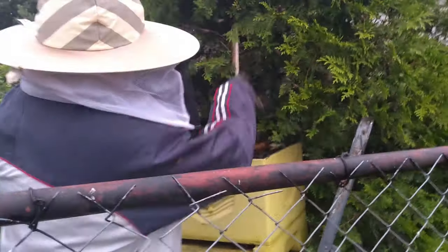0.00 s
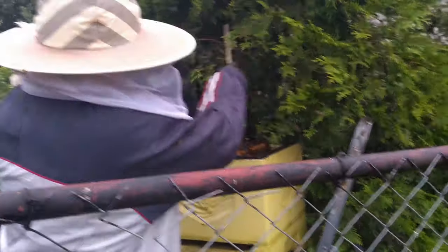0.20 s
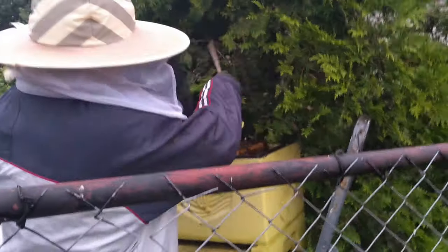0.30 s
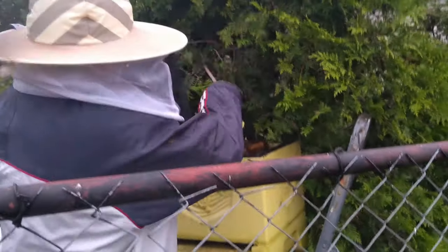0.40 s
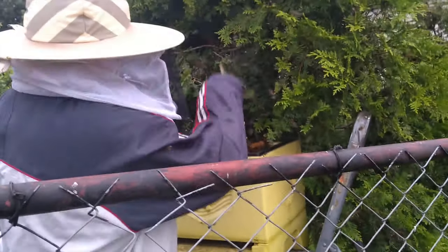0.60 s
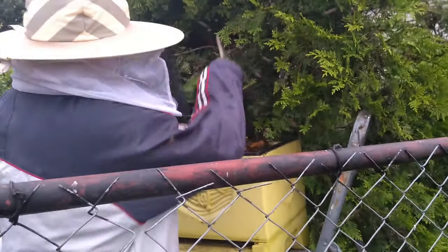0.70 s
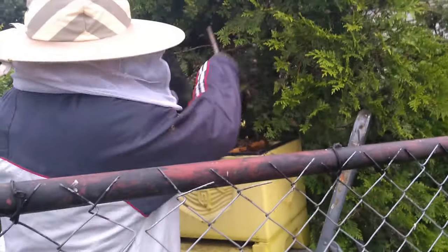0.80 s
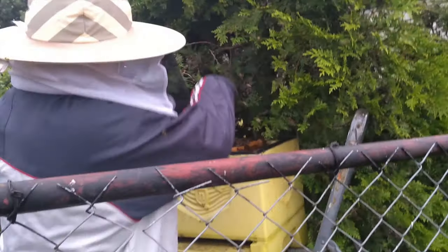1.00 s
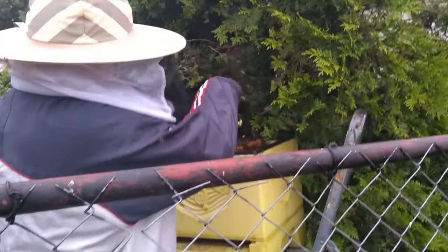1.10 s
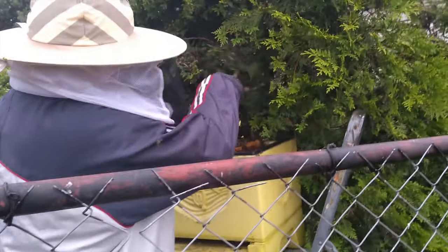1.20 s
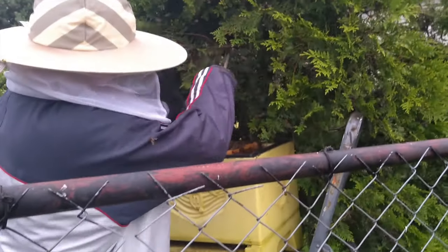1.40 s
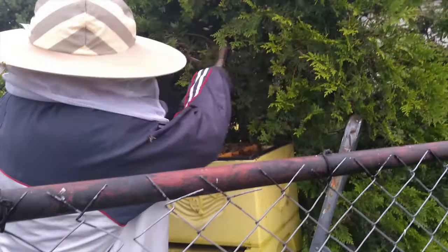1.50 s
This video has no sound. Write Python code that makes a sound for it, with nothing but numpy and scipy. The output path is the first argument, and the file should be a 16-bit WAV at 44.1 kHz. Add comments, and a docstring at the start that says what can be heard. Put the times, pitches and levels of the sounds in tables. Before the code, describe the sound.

A bee buzzes twice right past the microphone, softly bumping it, then flies off.

```python
"""A garden, beside an open beehive. One honeybee swerves twice right past the microphone, buzzing; its wing
strokes brush the case with soft thumps and a tick and buffet it with puffs of air, then it flies off.
Other bees hum faintly at the hive. Behind them a distant wash, a low rumble and wavering low tones
swell towards the end over a fine hiss, and something rustles briefly."""
import sys
import numpy as np
from scipy import signal
from scipy.fft import rfft, irfft
from scipy.io import wavfile

SR = 44100
rng = np.random.default_rng(int(sys.argv[2]) if len(sys.argv) > 2 else 0)


def put_to_file(sound):
    """Save the sound as 16-bit audio at rate SR, in the file named by the first command-line argument."""
    columns = np.atleast_2d(sound).T  # one column per channel
    safe = np.clip(columns, -1, 1)
    whole_steps = np.round(safe * 32767)
    wavfile.write(sys.argv[1], SR, whole_steps.astype(np.int16))


N = 70560
T = np.arange(N) / SR
BIN_HZ = np.arange(N // 2 + 1) * SR / N


def from_db(db):
    """Decibels to gain."""
    return 10 ** (np.asarray(db) / 20)


def unit_power(x):
    """Scale to an RMS of 1."""
    return x / np.sqrt(np.mean(x ** 2) + 1e-20)


def in_time(rows):
    """Glide between timed rows: one curve for each column after the time."""
    times, *columns = np.transpose(rows)
    return [np.interp(T, times, column) for column in columns]


def fader(levels):
    """Gain at every sample, from rows of seconds and dB."""
    return from_db(in_time(levels)[0])


def swell(centre_s, width_s):
    """A smooth bell of height 1; its width is one standard deviation."""
    return np.exp(-.5 * ((T - centre_s) / width_s) ** 2)


def db_at(colour, hz):
    """Read a spectrum on a log-frequency axis."""
    points_hz, db = np.transpose(colour)
    return np.interp(np.log(np.maximum(hz, 1)), np.log(points_hz), db)


def drift(rate_hz):
    """A smooth random wander with an RMS of 1."""
    pole = np.exp(-2 * np.pi * rate_hz / SR)
    wander = signal.lfilter([1], [1, -2 * pole, pole * pole], rng.standard_normal(2 * N))
    return unit_power(wander[N:])


def noise(colour):
    """Unit-power noise with a given spectrum."""
    white = rfft(rng.standard_normal(N))
    return unit_power(irfft(white * from_db(db_at(colour, BIN_HZ)), N))


def phase_of(hz):
    """Running phase of a moving pitch."""
    return 2 * np.pi * np.cumsum(hz) / SR


def partial(phase, ratio):
    """A unit-power sine at a multiple of the pitch, signed to stack into a saw-like wave."""
    return -np.sqrt(2) * np.sin(ratio * phase)


def ports(x, left_trim_db=0):
    """The microphone's two ports: the left hears later, inverted and at its own level."""
    lag_s, left_db = 0.0004835, -2
    late = irfft(rfft(x) * np.exp(-2j * np.pi * BIN_HZ * lag_s), N)
    return np.array([-from_db(left_db + left_trim_db) * late, x])


def diffuse(colour):
    """Wide noise, independent on each side."""
    return np.array([noise(colour), noise(colour)])


def lean_right(x, left_db=-18.5):
    """Place a sound well to the right."""
    return np.array([from_db(left_db) * x, x])


# The hiss sinks mid-scene and creeps back. Each row: time in seconds, level in dB.
HISS_LEVEL = [(0,-75.5),(0.35,-79.5),(0.5,-85),(0.85,-85),(1.0,-81.5),(1.6,-77)]
# Airy top, also used for the close bee's wisps. Each row: frequency in Hz, relative level in dB.
HISS_COLOUR = [(2000,-14.5),(5000,0.5),(8000,0),(14000,-0.5)]

def hiss():
    """A fine, bright hiss, leaning left."""
    bed = ports(noise(HISS_COLOUR), left_trim_db=6.5) + 0.18 * diffuse(HISS_COLOUR)
    return bed * fader(HISS_LEVEL)


# The wash dips, then builds to the end. Each row: time in seconds, level in dB.
WASH_LEVEL = [(0,-61),(0.17,-59.5),(0.43,-69.5),(0.7,-67.5),(1.0,-62),(1.25,-59.5),(1.42,-58),(1.502,-54.5),(1.6,-53.5)]
# Full mids, dull top. Each row: frequency in Hz, relative level in dB.
WASH_COLOUR = [(60,-1),(150,0),(350,-2.5),(520,1),(650,-6.5),(1050,-1),(1400,0.5),(1800,-2),(2400,-6.5),(3400,-15.5),(5000,-24.5),(7000,-35.5),(14000,-54)]

def distant_wash(split_hz=1330):
    """Far-off outdoor noise whose lows reach both ports in step."""
    wash = noise(WASH_COLOUR)
    lows = signal.sosfiltfilt(signal.butter(6, split_hz, fs=SR, output="sos"), wash)
    centred_lows = np.array([from_db(-0.5) * lows, lows])
    highs = ports(wash - lows, left_trim_db=1.0)
    return (centred_lows + highs + 0.45 * diffuse(WASH_COLOUR)) * fader(WASH_LEVEL)


# The rumble falls away and swells late. Each row: time in seconds, level in dB.
RUMBLE_LEVEL = [(0,-63.5),(0.15,-62),(0.45,-71.5),(0.7,-72),(1.05,-69.5),(1.151,-71),(1.422,-65),(1.49,-65),(1.6,-58)]
# Weight around 80 Hz. Each row: frequency in Hz, relative level in dB.
RUMBLE_COLOUR = [(25,-17),(50,-1),(80,6),(115,4.5),(150,-6.5),(220,-5),(400,-31.5)]

def rumble():
    """A bed of bass noise on the right."""
    return lean_right(noise(RUMBLE_COLOUR)) * fader(RUMBLE_LEVEL)


# Far-off tones, one curve each. Each row: time in seconds, pitch in Hz, level in dB.
HUM_CURVES = [
    [(0.45,140.7,-89),(0.65,139.4,-68),(0.95,137.9,-75),(1.15,146.6,-69),(1.33,140.7,-61.5),(1.42,171.2,-66),(1.6,184,-61.5)],
    [(1.0,108.4,-89),(1.17,107.5,-62.5),(1.4,109.5,-71),(1.49,115.6,-58.5),(1.6,113.5,-58)],
    [(1.3,188.8,-77.5),(1.4,224.3,-61),(1.5,276.7,-63.5),(1.6,276.3,-56)],
]

def low_hum(waver=0.03, flicker_db=3.3):
    """Low tones that waver and swell in the distance."""
    out = np.zeros(N)
    for curve in HUM_CURVES:
        hz, db = in_time(curve)
        gain = from_db(db + flicker_db * drift(19))
        phase = phase_of(hz * (1 + waver * drift(17)))
        out += gain * partial(phase, 1)
    return lean_right(out)


# Two light brushes, close together. Each row: centre in seconds, level in dB, width in seconds.
RUSTLES = [(0.967,-73.5,0.0066),(1.003,-70,0.026)]
# Only the very top. Each row: frequency in Hz, relative level in dB.
RUSTLE_COLOUR = [(7000,-19),(12000,0.5),(14000,-2)]

def rustle(grain_db=5):
    """A brief, bright, grainy brush, perhaps of a sleeve."""
    grains = unit_power(noise(RUSTLE_COLOUR) * from_db(grain_db * drift(300)))
    return grains * sum(from_db(db) * swell(centre, width) for centre, db, width in RUSTLES)


# The hive's hum recedes and returns. Each row: time in seconds, level in dB.
HIVE_LEVEL = [(0,-61.5),(0.14,-61.5),(0.45,-77),(1.3,-72.5),(1.5,-59.5)]
# A mellow buzz. Each row: frequency in Hz, relative harmonic level in dB.
HIVE_COLOUR = [(250,-2.5),(500,-2.5),(750,-4),(1000,-6),(1300,-13.5),(2000,-23),(3000,-22.5)]

def hive(bees=5, wingbeat_hz=250.4, pitch_spread=0.055, flicker_db=2.5):
    """The wingbeats of several distant bees, each wandering in pitch and level."""
    out = np.zeros(N)
    for _ in range(bees):
        phase = phase_of(wingbeat_hz * (1 + pitch_spread * drift(4)))
        buzz = np.zeros(N)
        for k in range(1, 12):
            gain = from_db(db_at(HIVE_COLOUR, k * wingbeat_hz))
            buzz += gain * np.sin(k * phase + rng.uniform(0, 2 * np.pi))
        out += buzz * from_db(flicker_db * drift(2.3))
    return unit_power(out) * fader(HIVE_LEVEL)


# Wing air hits the microphone. Each row: centre in seconds, level in dB, width in seconds, cutoff in Hz.
PUFFS = [(0.2262,-30.5,0.0028,1150),(0.228,-27,0.0073,153),(0.262,-40,0.02,164),(0.313,-29.5,0.0064,223),(0.342,-32.5,0.01,1040),(0.353,-34,0.007,84),(0.365,-28,0.005,178)]
# A puff's body before its low-pass. Each row: frequency in Hz, relative level in dB.
PUFF_COLOUR = [(30,-9.5),(60,-10.5),(350,0),(600,-10.5),(1100,-17.5)]

def wing_air():
    """Short puffs of turbulence from the wings, some dull, some brighter."""
    out = np.zeros(N)
    for centre, db, width, cutoff_hz in PUFFS:
        air = signal.sosfilt(signal.butter(3, cutoff_hz, fs=SR, output="sos"), noise(PUFF_COLOUR))
        shape = swell(centre, width)
        rms_in_puff = np.sqrt(np.average(air ** 2, weights=shape ** 2))
        out += from_db(db) * shape * air / rms_in_puff
    return out


def ring(start_s, hz, t60_s):
    """A struck resonance that falls 60 dB in t60_s."""
    age = np.maximum(T - start_s, 0)
    return from_db(-60 * np.minimum(age / t60_s, 10)) * np.sin(2 * np.pi * hz * age)


# Wing strokes that brush the case. Each row: start in seconds, level in dB, pitch in Hz.
WING_THUMPS = [(0.2116,-21,380),(0.2234,-17.5,355),(0.3708,-32.5,171)]

def wing_thumps(ring_cycles=6.7, cutoff_hz=1080):
    """Single close wing strokes brush the case: soft, heavily damped low thumps."""
    thumps = sum(from_db(db) * ring(start, hz, ring_cycles / hz) for start, db, hz in WING_THUMPS)
    return signal.sosfilt(signal.butter(2, cutoff_hz, fs=SR, output="sos"), thumps + 1e-18)


# One sharp touch on the case. Each row: start in seconds, level in dB.
TICKS = [(0.2144,-16)]
# The case's ring. Each row: frequency in Hz, relative level in dB, seconds to fall 60 dB.
CASE_MODES = [(2530,-21.5,0.011),(3500,-18.5,0.0065),(4410,-14,0.0026),(7380,-4.5,0.0017),(8520,-3,0.0011),(10700,-8,0.0016),(12600,-10,.0015)]

def case_tick():
    """A tiny hard contact rings the case for a few milliseconds, its modes alternating in sign."""
    out = np.zeros(N)
    for start, db in TICKS:
        for k, (hz, mode_db, t60_s) in enumerate(CASE_MODES):
            out += (-1) ** k * from_db(db + mode_db) * ring(start, hz, t60_s)
    return out


# The close bee's pitch as it swerves. Each row: time in seconds, wingbeat in Hz.
WINGBEAT = [(0.14,259.3),(0.184,269),(0.204,253.5),(0.222,247.2),(0.236,221),(0.254,246.8),(0.27,230.1),(0.282,245),(0.302,252.1),(0.342,232.2),(0.396,239.4),(0.42,230.8),(0.468,242),(0.496,267.3),(0.55,249.3),(0.58,257.4),(0.63,250.9),(0.8,253.9)]
# Two passes and away. Each row: time in seconds, then fundamental, octave and upper harmonics in dB.
FLYBY_LEVELS = [(0.15,-73,-72,-83),(0.18,-51,-62,-63.5),(0.197,-44,-47.5,-54),
                (0.212,-31,-33.5,-42),(0.224,-26,-37.5,-53.5),(0.233,-40,-39,-52.5),
                (0.246,-50,-43.5,-53),(0.268,-47,-44,-56),(0.288,-50,-46,-56),
                (0.306,-36,-39,-52.5),(0.318,-43,-35,-51),(0.331,-25.5,-37,-54.5),(0.343,-23,-41.5,-54.5),
                (0.349,-45,-41,-56),(0.362,-38,-41.5,-59),(0.385,-54,-52.5,-62.5),
                (0.415,-58,-70,-71),(0.47,-66,-85,-80),(0.497,-56.5,-59,-68),(0.518,-57,-64,-75),
                (0.548,-86,-78,-88),(0.587,-62.5,-62,-70.5),(0.63,-74,-71.5,-76.5),(0.74,-77.5,-71.5,-77.5),(1.2,-88,-87,-82.5)]
# The rasp of the upper harmonics. Each row: frequency in Hz, relative level in dB.
RASP_COLOUR = [(720,-2),(1000,-2),(1250,-5),(1480,-8),(1750,-18),(2100,-20),(3400,-26.5),(4500,-39)]

def close_bee(jitter=0.00803, shimmer_db=2.8, flutter_db=2, wisp_db=-25, contact_s=0.2127):
    """Uneven wing strokes, each with a wisp of air; the lowest partials swell most as the bee nears."""
    hz = in_time(WINGBEAT)[0] * (1 + jitter * drift(53))
    phase = phase_of(hz)
    phase -= np.interp(contact_s, T, phase)  # a stroke lands just as the wing meets the case
    fundamental_gain, octave_gain, upper_gain = from_db(in_time(FLYBY_LEVELS))
    rasp = np.zeros(N)
    for k in range(3, 19):
        rasp += from_db(db_at(RASP_COLOUR, k * hz) + shimmer_db * drift(73)) * partial(phase, k)
    wisps = from_db(wisp_db) * noise(HISS_COLOUR) * (1 + np.cos(phase)) ** 2
    fundamental = fundamental_gain * partial(phase, 0.98)  # a touch flat of the wingbeat
    octave = octave_gain * from_db(flutter_db * drift(62)) * partial(phase, 2)
    return fundamental + octave + upper_gain * (rasp + wisps)


def scene():
    """Bees and rustle at the two ports, over the garden's background."""
    sources = ports(close_bee() + wing_air() + wing_thumps() + hive() + rustle())
    tick = ports(case_tick(), left_trim_db=-2.5)
    garden = distant_wash() + rumble() + hiss() + low_hum()
    return sources + tick + garden


def record(dry):
    """The deep bass is rolled off and the top is cut steeply."""
    low_cut_hz, high_cut_hz = 51.6, 14400
    trimmed = signal.sosfilt(signal.butter(4, low_cut_hz, "high", fs=SR, output="sos"), dry)
    return signal.sosfilt(signal.ellip(10, .1, 70, high_cut_hz, fs=SR, output="sos"), trimmed)


dry = scene()
out = record(dry)
put_to_file(out)
```